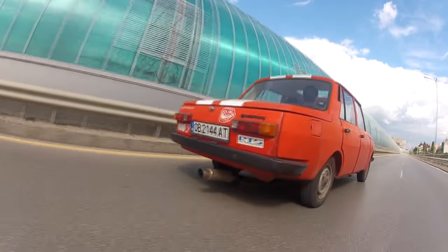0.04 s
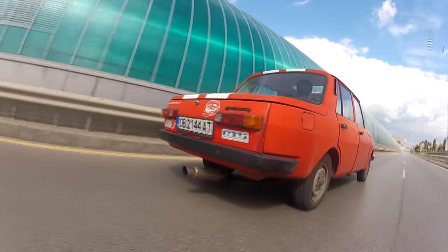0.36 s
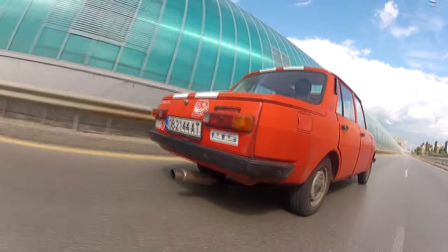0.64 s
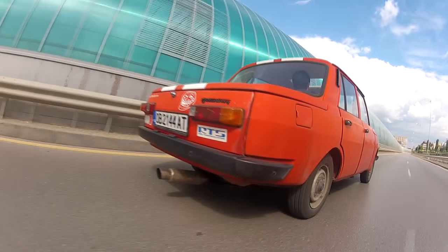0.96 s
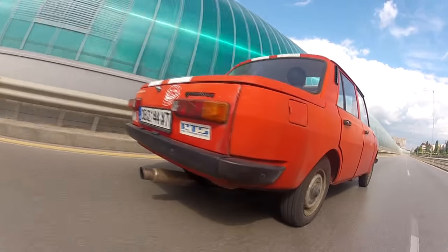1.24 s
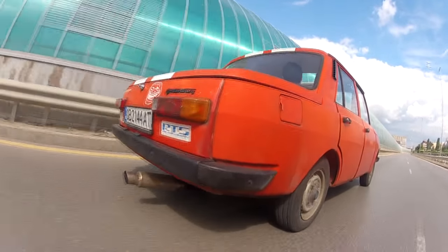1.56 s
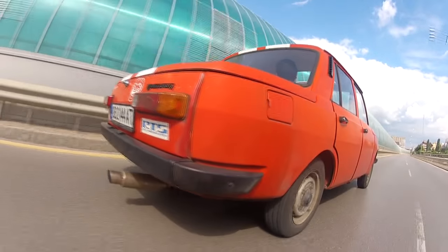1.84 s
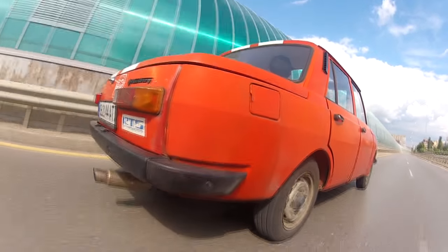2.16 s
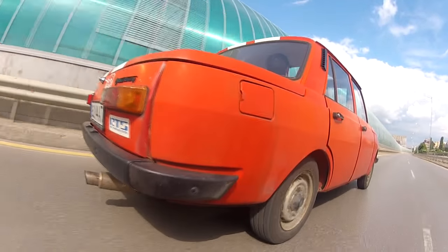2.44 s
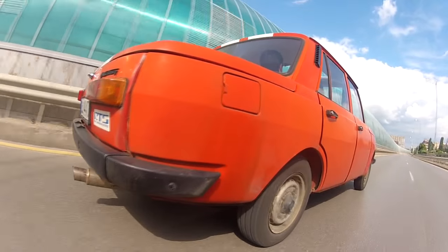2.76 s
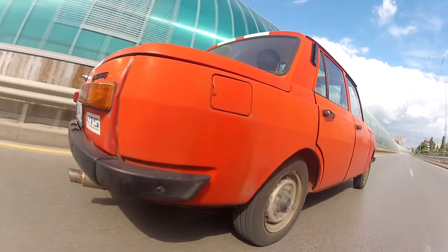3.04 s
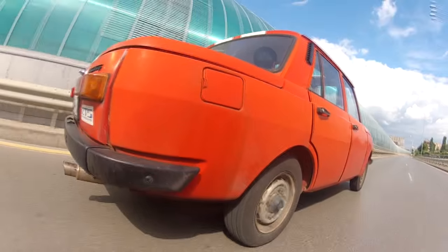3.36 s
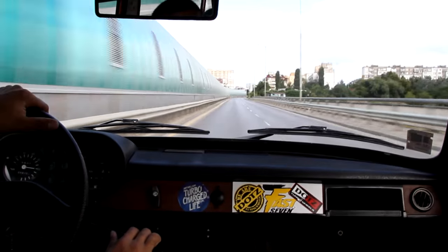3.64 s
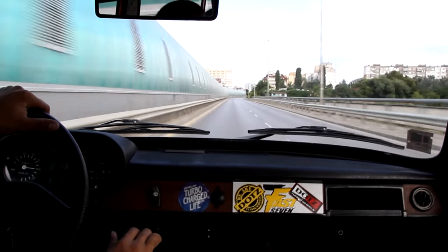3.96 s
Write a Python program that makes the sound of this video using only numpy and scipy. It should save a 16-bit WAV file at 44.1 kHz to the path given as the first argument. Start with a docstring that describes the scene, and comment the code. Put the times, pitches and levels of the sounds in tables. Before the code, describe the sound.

Steady, raspy exhaust drone of a moving old car, switching to a duller boom inside.

```python
"""First you hear the drone of an old three-cylinder two-stroke car, slowly gaining speed.
Its firings sound a note in the tailpipe, its opening ports rasp and the rushing gas hisses.
A microphone outside swings from behind the pipe to the car's side and adds a thin fizz on top.
Near the end the scene cuts to the cabin, where the same engine makes the panels boom
over drivetrain whine and the noise of road and wind."""
import sys
import numpy as np
from scipy import signal
from scipy.fft import rfft, irfft
from scipy.io import wavfile

SR = 44100
rng = np.random.default_rng(int(sys.argv[2]) if len(sys.argv) > 2 else 0)


def file_out(sig):
    """Save sig as 16-bit WAV at sys.argv[1]."""
    # one column per channel
    cols = np.atleast_2d(sig).T
    # limit, then scale
    lim = np.clip(cols, -1, 1)
    pcm = np.round(lim * 32767).astype(np.int16)
    wavfile.write(sys.argv[1], SR, pcm)


N = 176400
T = np.arange(N) / SR

# How fast the engine's crankshaft spins. Each row: time in seconds, turns per second.
CRANK_SPEED = [(0.0, 56.0), (0.4, 56.4), (3.11, 58.5), (3.75, 58.8), (4.0, 59.2)]
# An "order" is a tone at a multiple of that speed: order 3 vibrates three times a turn.
# The drone heard behind the tailpipe. Each row: order, relative level in dB.
DRONE_BEHIND_PIPE = [(1, -23), (2, -16), (3, -5), (4, -25), (5, -15), (6, 0), (7, -19), (8, -17), (9, -19),
                     (10, -22), (11, -16), (12, -11), (13, -10.5), (14, -9), (15, -13.5), (16, -28),
                     (17, -21), (18, -30), (19, -32), (20, -32), (21, -27), (22, -35), (23, -29), (24, -29),
                     (25, -34), (26, -34), (27, -37), (28, -36), (29, -33), (30, -39), (31, -40), (32, -26),
                     (33, -33), (34, -36), (35, -34), (36, -44), (37, -36), (38, -36), (39, -33), (40, -37)]
# The drone heard beside the car. Each row: order, relative level in dB.
DRONE_BESIDE_CAR = [(1, -25), (2, -24), (3, -7), (4, -27), (5, -12), (6, 0), (7, -20), (8, -20), (9, -16),
                    (10, -25), (11, -18), (12, -11), (13, -10), (14, -12), (15, -23), (16, -25), (17, -19),
                    (18, -28), (19, -31), (20, -32), (21, -33), (22, -35), (23, -32), (24, -29), (25, -36),
                    (26, -28), (27, -44), (28, -44), (29, -40), (30, -34), (31, -32), (32, -27), (33, -27),
                    (34, -44), (35, -36), (36, -47), (37, -35), (38, -38), (39, -36), (40, -42)]
# The rasp of the opening ports. Each row: order, relative level in dB.
RASP_ORDERS = [(41, -8), (42, -1), (43, -7), (44, -17), (45, 0), (46, -7), (47, -4), (49, -15), (50, -3),
               (51, 1), (52, -1), (54, -6), (56, -11), (58, -8), (59, -16), (60, -11), (62, -22), (64, -11),
               (67, -19), (68, -12), (69, -15), (70, -9), (73, -18), (95, -26)]
# The hiss of swirling exhaust gas. Each row: frequency in Hz, relative level in dB.
GAS_SPECTRUM = [(25, -17), (55, -5), (110, -2), (230, -1), (380, 0), (510, -5), (630, -3.5), (790, 0),
                (950, -8), (1300, -13.5), (1650, -15), (1900, -12.5), (2500, -19), (2750, -19.5),
                (2950, -16), (3300, -20), (3700, -25), (5500, -24)]
# The boom of the cabin panels. Each row: order, relative level in dB.
BOOM_ORDERS = [(1, -28), (2, -21), (3, -1), (4, -20), (5, -20), (6, 0), (7, -13), (8, -17), (9, -13),
               (11, -28), (12, -15), (13, -13), (14, -1), (15, -18), (16, -26), (17, -20), (18, -16),
               (19, -20), (20, -26), (21, -22), (22, -28), (25, -28), (26, -18), (27, -26), (28, -24),
               (29, -15), (30, -24)]
# How the boom wavers. Each row: time in seconds, added level in dB.
BOOM_WAVER = [(3.56, 3), (3.68, 3.5), (3.77, 1), (3.85, 3), (4, 4)]
# The whine and clatter of the drivetrain. Each row: order, relative level in dB.
WHINE_ORDERS = [(31, -3), (32, -5), (33, -6), (34, -9), (35, -9), (43, -5), (44, -3), (46, -8), (48, -11),
                (51, -7), (52, -8), (58, -3), (60, -10), (62, -10)]
# Road and wind noise in the cabin. Each row: frequency in Hz, relative level in dB.
ROAD_SPECTRUM = [(25, -15), (55, -13), (130, -6), (220, -1.5), (400, -3), (520, -1), (650, -5.5),
                 (850, -3.5), (1100, -4), (1400, -9.5), (1900, -8), (2400, -9), (3300, -14.5), (5000, -20),
                 (8000, -29), (12000, -37), (15000, -44)]

SWING_START_S, SWING_END_S = 0.99, 2.83   # from behind the pipe to the car's side
CUT_S, FADE_S = 3.558, 0.0061   # the move into the cabin
DRONE_DB, RASP_DB, GAS_DB = -12, -49.5, -30.5   # gains outside
BOOM_DB, WHINE_DB, ROAD_DB = -23.5, -45.5, -25   # gains inside
WHINE_RISE_DB_PER_S = 19.5
HONK_ORDER = 13.2   # the silencer resonates here and holds the sound back longest
EARLIER_BELOW, EARLIER_ABOVE = .186, .354   # orders either side of the honk come sooner (turns per order)
RING_ABOVE_ORDER = 27   # the drone's higher orders gather into one metallic ring a turn
RING_DELAY, RING_SPREAD, RASP_SPREAD = -0.1017, 0.29, 0.524   # timing and its scatter, in turns
IMBALANCE_LAG = 0.057   # the beat of the unequal cylinders trails the even firing note (cycles)
MIC_TOP_HZ, FIZZ_HZ, FIZZ_DB = 5120, 12000, 5.5


def exhaust_drone(crank):
    """The pipe's note, strongest at twice the firing rate; its tone shifts as the microphone swings."""
    swing = np.clip((T - SWING_START_S) / (SWING_END_S - SWING_START_S), 0, 1)
    lags = pipe_lags(np.array(DRONE_BEHIND_PIPE)[:, 0])
    drone = 0
    for (order, behind_db), (_, beside_db), lag in zip(DRONE_BEHIND_PIPE, DRONE_BESIDE_CAR, lags):
        gain = (1 - swing) * from_db(behind_db) + swing * from_db(beside_db)
        depth = 0.013 * (1 - np.clip(gain, 0, 1))   # uneven burning shakes the weak orders most
        drone += gain * flutter(depth, rate_hz=30) * order_tone(crank, order, lag)
    return from_db(DRONE_DB) * drone


def pipe_lags(orders):
    """How many cycles each order lags in the pipe, added up from the arrival times."""
    above_honk = orders - .5 - HONK_ORDER
    honk = np.minimum(EARLIER_BELOW * above_honk, -EARLIER_ABOVE * above_honk)
    ring = RING_DELAY + RING_SPREAD * rng.uniform(-1.04, 1, len(orders))
    arrivals = np.where(orders > RING_ABOVE_ORDER, ring, honk)
    off_beat = orders % 3 > 0   # not a multiple of the firing rate
    return np.cumsum(arrivals) + IMBALANCE_LAG * off_beat


def port_rasp(crank):
    """The opening ports make a thin, continuous metallic rasp whose rough pattern repeats each turn."""
    orders = range(RASP_ORDERS[0][0], RASP_ORDERS[-1][0])
    lags = np.cumsum(RING_DELAY + RASP_SPREAD * rng.uniform(-0.983, 1, len(orders)))
    rasp = 0
    for order, lag in zip(orders, lags):
        rasp += from_db(look_up(RASP_ORDERS, order)) * order_tone(crank, order, lag)
    return from_db(RASP_DB) * rasp * flutter(0.055, rate_hz=60)


def gas_hiss(crank):
    """Swirling gas leaves the tailpipe in gentle puffs."""
    noise = puffs(crank, per_turn=0.049, per_firing=0.032)
    return from_db(GAS_DB) * shape_noise(noise, GAS_SPECTRUM)


def cabin_boom(crank):
    """The engine shakes the cabin panels, which boom at its orders."""
    boom = wavering_tones(crank, BOOM_ORDERS, depth=0.087, rate_hz=6.2)
    return from_db(BOOM_DB + look_up(BOOM_WAVER, T)) * boom


def drivetrain_whine(crank):
    """Whine and clatter come through the cabin's front wall and grow as the engine pulls."""
    rise_db = WHINE_RISE_DB_PER_S * np.maximum(T - CUT_S, 0)
    return from_db(WHINE_DB + rise_db) * wavering_tones(crank, WHINE_ORDERS, depth=0.14, rate_hz=20)


def road_and_wind(crank):
    """Road and wind rush through the car's body; the noise swells a little with each firing."""
    noise = puffs(crank, per_turn=0, per_firing=0.079)
    return from_db(ROAD_DB) * shape_noise(noise, ROAD_SPECTRUM)


def outside_microphone(sound):
    """The microphone dulls the treble and adds a fizz: the sound mirrored around FIZZ_HZ."""
    dull = signal.sosfilt(signal.butter(12, MIC_TOP_HZ, fs=SR, output="sos"), sound)
    fizz = np.gradient(dull) * np.cos(2 * np.pi * FIZZ_HZ * T)
    return dull + from_db(FIZZ_DB) * signal.lfilter([1], [1, -.9], fizz)


def order_tone(crank, order, lag):
    """One tone locked to the crankshaft, running late by `lag` cycles."""
    return np.sqrt(2) * np.cos(order * crank - 2 * np.pi * lag)


def wavering_tones(crank, table, depth, rate_hz):
    """Add up a table's orders, each with its own flutter and a random lag."""
    return sum(from_db(db) * flutter(depth, rate_hz) * order_tone(crank, order, rng.random())
               for order, db in table)


def puffs(crank, per_turn, per_firing):
    """Noise that swells by the given depths with each turn and each of its three firings."""
    swell = per_turn * np.cos(crank) + per_firing * np.cos(3 * crank)
    return rng.standard_normal(N) * np.exp(swell)


def flutter(depth, rate_hz):
    """A gain that wanders at random around 1, mostly slower than rate_hz."""
    step, warm_up = 40, 2000   # one random value every 40 samples; skip the first 2000 values
    pole = np.exp(-2 * np.pi * rate_hz * step / SR)
    noise = rng.standard_normal(N // step + warm_up + 2)
    slow = signal.lfilter([1], [1, -2 * pole, pole * pole], noise)[warm_up:]
    return 1 + depth * np.interp(np.arange(N) / step, np.arange(len(slow)), unit_level(slow))


def shape_noise(noise, spectrum):
    """Give noise the lows and highs of a spectrum table, at an average level of 1."""
    hz, db = np.transpose(spectrum)
    bin_hz = np.maximum(np.arange(N // 2 + 1) * SR / N, 1)
    gain = from_db(np.interp(np.log(bin_hz), np.log(hz), db))
    return unit_level(irfft(rfft(noise) * gain, N))


def look_up(table, position):
    """Read a table, drawing straight lines between its rows."""
    return np.interp(position, *np.transpose(table))


def unit_level(sound):
    """Scale a sound so that its average level (rms) is 1."""
    return sound / np.sqrt(np.mean(sound ** 2) + 1e-20)


def from_db(db):
    """Turn decibels into a number to multiply by."""
    return 10 ** (np.asarray(db) / 20)


def scene():
    """One engine, heard first from outside and then from the cabin."""
    crank = 2 * np.pi * np.cumsum(look_up(CRANK_SPEED, T)) / SR   # crankshaft angle in radians
    outside = outside_microphone(exhaust_drone(crank) + port_rasp(crank) + gas_hiss(crank))
    inside = cabin_boom(crank) + drivetrain_whine(crank) + road_and_wind(crank)
    fade_out = np.clip((CUT_S - T) / FADE_S, 0, 1)
    fade_in = np.clip((T - CUT_S) / FADE_S, 0, 1)
    return (fade_out * outside + fade_in * inside)[None]


def record(dry):
    """Cut the treble steeply above 15400 Hz."""
    return signal.sosfilt(signal.ellip(12, .1, 80, 15400, fs=SR, output="sos"), dry)


dry = scene()
out = record(dry)
file_out(out)
```